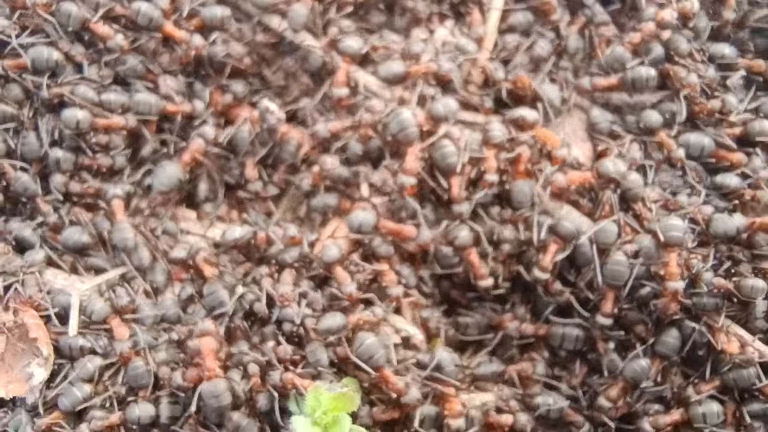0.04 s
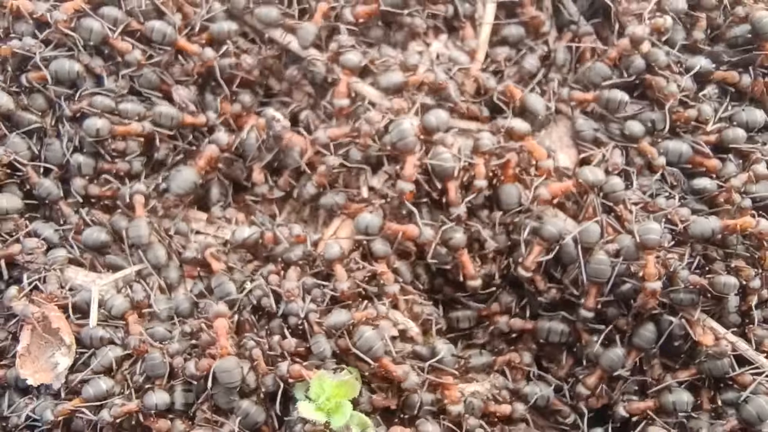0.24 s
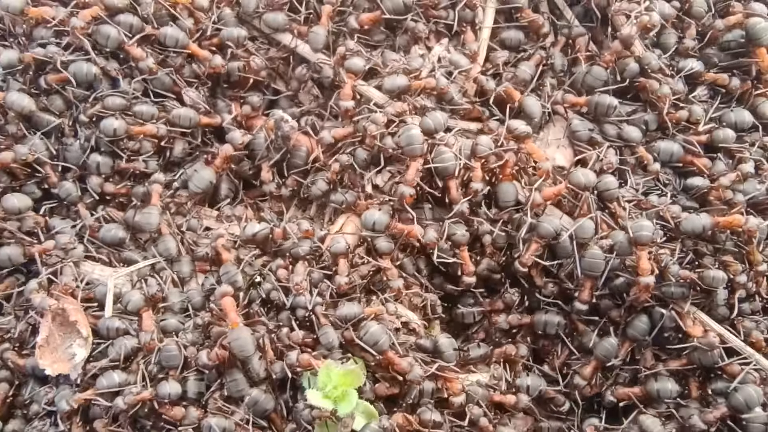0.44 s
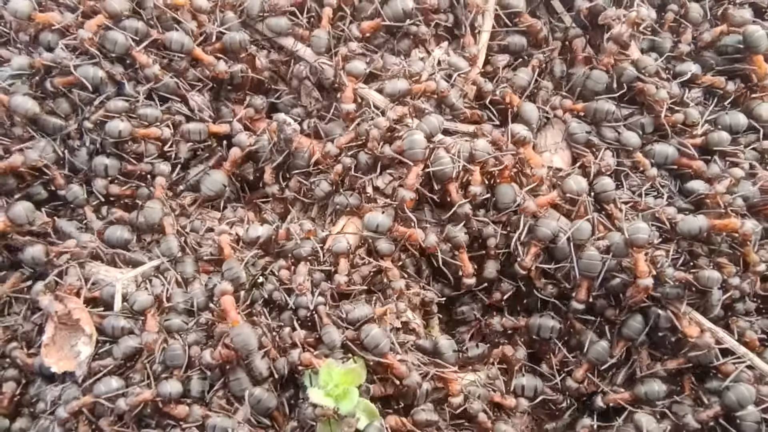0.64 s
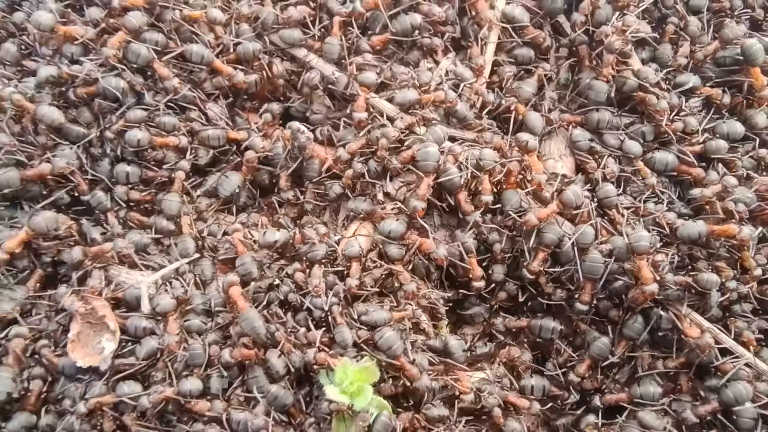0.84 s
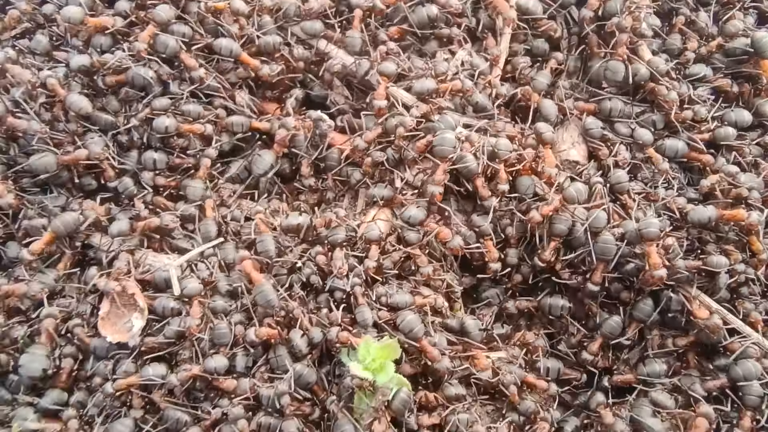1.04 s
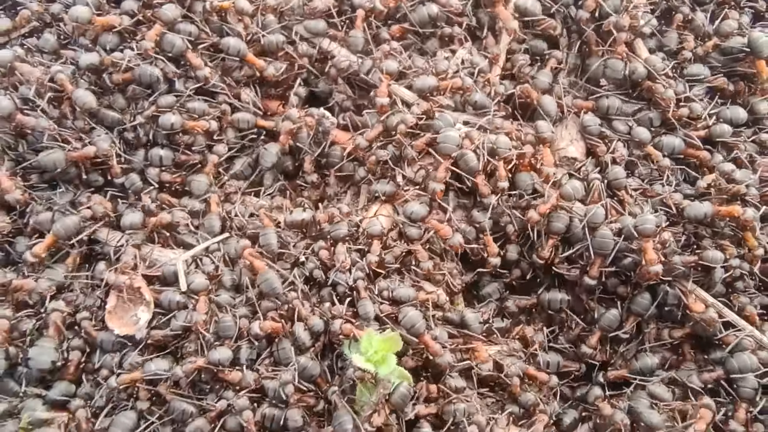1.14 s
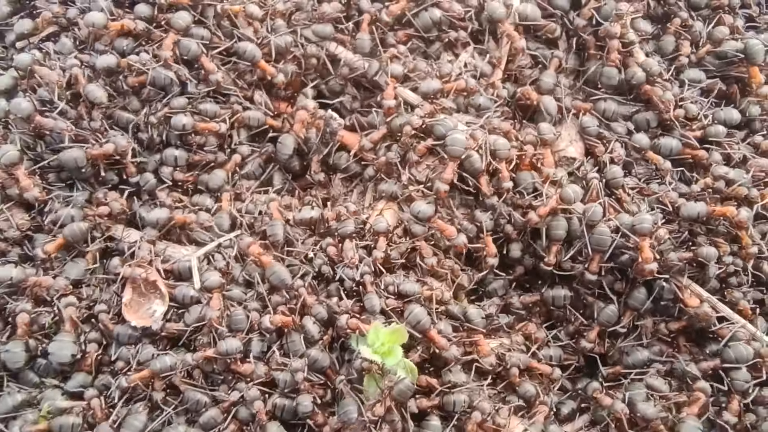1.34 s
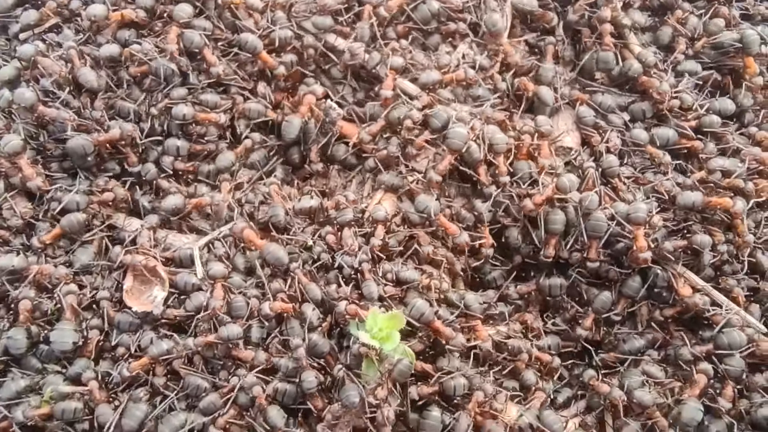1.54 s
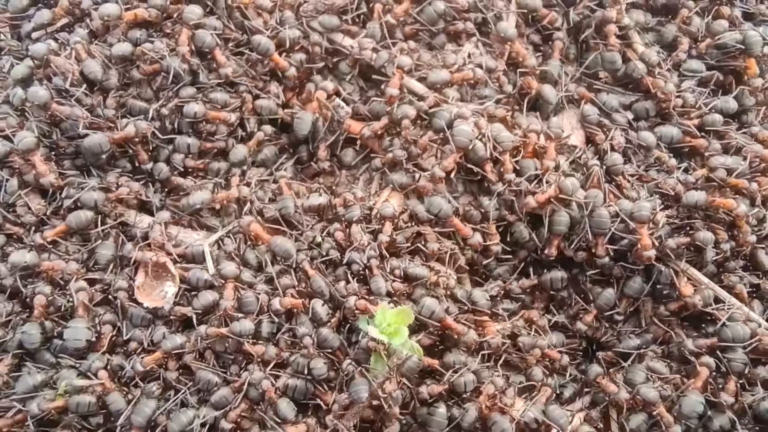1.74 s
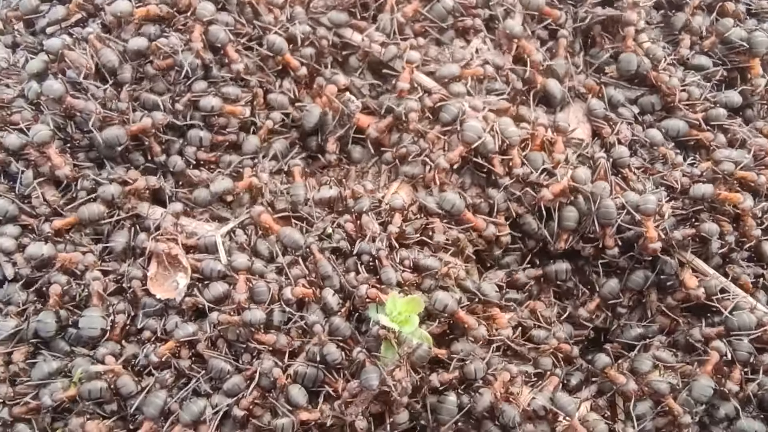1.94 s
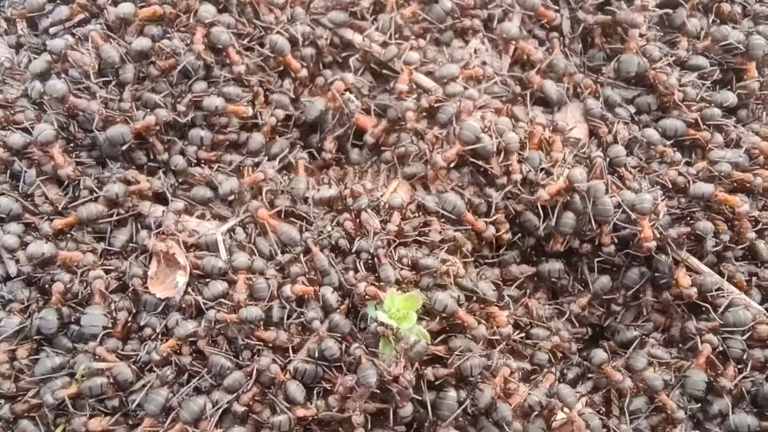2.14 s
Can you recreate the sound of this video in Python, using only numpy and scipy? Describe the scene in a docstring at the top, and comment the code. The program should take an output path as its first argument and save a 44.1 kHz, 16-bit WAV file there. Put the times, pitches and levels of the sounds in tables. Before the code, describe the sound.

Light wind flutters low and unevenly on the microphone throughout, mostly on the left, with harder thumps around 0.3, 0.85, 1.0 and 1.3 seconds. Underneath are a faint steady hiss and the fine crackle of ants on dry litter, more to the right, with soft rustles near 0.5, 0.7 and 1.8 seconds. A very faint distant bird chirps at the start and around 1.7 seconds.

```python
"""Breeze over an anthill

A light breeze throws eddies (little swirls of air) at two microphone openings, mostly the left one,
making a low flutter with a few harder thumps. Under it lie a steady hiss, the fine crackle of
thousands of ant legs on dry plant litter, a few soft rustles and a faint, far bird."""
import sys
import numpy as np
from scipy import signal
from scipy.fft import rfft, irfft
from scipy.io import wavfile
from scipy.ndimage import uniform_filter1d

SR = 44100
rng = np.random.default_rng(int(sys.argv[2]) if len(sys.argv) > 2 else 0)


def file_out(sig):
    """Save sig as 16-bit WAV at sys.argv[1]."""
    # one column per channel
    cols = np.atleast_2d(sig).T
    # limit, then scale
    lim = np.clip(cols, -1, 1)
    pcm = np.round(lim * 32767).astype(np.int16)
    wavfile.write(sys.argv[1], SR, pcm)


N = 97020

# Tone of dry litter when it is tapped: frequency_hz, relative_db
LITTER_TONE = [(600, 0), (1100, 3), (2000, -1), (4000, -2), (6200, -6), (8000, -9), (9500, -24),
               (15000, -30)]


def undb(db):
    """Turn decibels into a number to multiply by."""
    return 10 ** (np.asarray(db) / 20)


def times():
    """The time of each sample, in seconds."""
    return np.arange(N) / SR


def unit(x):
    """Scale a signal to an average power of 1."""
    return x / np.sqrt(np.mean(x ** 2))


def wander(per_s):
    """A smooth random drift, about 1 in size."""
    hold = int(SR / per_s)
    steps = np.repeat(rng.standard_normal(N // hold + 1), hold)
    return unit(uniform_filter1d(steps, hold)[:N])


def colour(x, tone):
    """Shape a sound's tone with rows of frequency_hz, gain_db."""
    hz, db = np.array(tone).T
    bins_hz = np.maximum(np.arange(N // 2 + 1) * SR / N, 1)
    return irfft(rfft(x) * undb(np.interp(np.log(bins_hz), np.log(hz), db)), N)


def hiss():
    """Air and microphones hiss steadily, each side on its own, wavering a little."""
    # Tone of the hiss: frequency_hz, left_db, right_db
    hiss_tone = [(200, -95, -93), (500, -107, -103), (1200, -113, -110), (1900, -115, -105),
                 (3000, -119, -109), (6200, -117, -111), (7300, -127, -116), (8000, -130, -116),
                 (9000, -131, -132), (14000, -130, -130), (15200, -124, -123)]
    swell_db = .4 * wander(3)
    bins_hz = np.arange(N // 2 + 1) * SR / N
    band = np.floor(2 * np.log2(np.maximum(bins_hz, 500)))  # half an octave each
    out = []
    for side, trim_db in enumerate((-.3, -.4)):
        white = rfft(rng.standard_normal(N))
        air = sum(irfft(white * (band == b), N) * undb(swell_db + .8 * wander(16))
                  for b in np.unique(band))
        tone = np.array(hiss_tone)[:, [0, side + 1]]
        out.append(colour(air, tone) * np.sqrt(SR / 2) * undb(trim_db))
    return np.array(out)


def bird():
    """A far bird sings thin, sliding notes; a quick random wobble in pitch blurs them."""
    # Bird notes: start_s, length_s, start_hz, end_hz, right_db, left_minus_right_db
    notes = [(-0.01, .055, 4980, 4750, -75, 0), (-0.02, .12, 3650, 3680, -73.5, -3),
             (0.06, .07, 5850, 5650, -76, -6), (0.105, .05, 3800, 4080, -76, 0),
             (1.58, .11, 3800, 3870, -83, 0), (1.73, .11, 1960, 1860, -73, -8)]
    out = np.zeros((2, N))
    for start_s, length_s, start_hz, end_hz, db, left_offset_db in notes:
        progress = np.clip((times() - start_s) / length_s, 0, 1)
        glide_hz = start_hz + (end_hz - start_hz) * progress
        for side, gain in enumerate(undb([db + left_offset_db, db])):
            hz = glide_hz * (1 + .015 * wander(250))
            out[side] += gain * np.sin(np.pi * progress) * np.sin(2 * np.pi * np.cumsum(hz) / SR)
    return out


def grainy_noise(tone):
    """Noise whose level flickers quickly."""
    return unit(colour(rng.standard_normal(N) * undb(1.5 * wander(120)), tone))


def rustles():
    """The litter gives soft rustles and a few dry ticks, nearer the right microphone."""
    # Soft rustles: middle_s, half_length_s, level_db
    swells = [(0.25, .07, -77), (0.525, .07, -70.5), (0.72, .08, -74), (1.775, .06, -71)]
    # Tone of a rustle: frequency_hz, relative_db
    rustle_tone = [(1000, -17), (1700, -10), (1920, 0), (2150, -8), (2500, -13), (3500, -20), (5600, -19),
                   (6100, -10), (6600, -21), (9000, -36)]
    # Dry ticks: middle_s, level_db
    ticks = [(0.08, -75), (0.523, -71), (0.563, -67.5)]
    t, tick_half_s = times(), .006
    swell = sum(undb(db) * np.exp(-((t - at) / half_s) ** 2) for at, half_s, db in swells)
    tick = sum(undb(db) * np.exp(-((t - at) / tick_half_s) ** 2) for at, db in ticks)
    left, right = (swell * grainy_noise(rustle_tone) + tick * grainy_noise(LITTER_TONE)
                   for _ in range(2))
    return np.array([undb(-8) * left, right])


def ants():
    """Countless tiny feet tap on dry needles, in flurries, a few of them louder."""
    steps_per_s, scatter_db = 600, 4.3
    flurry = undb(2 * wander(12))
    out = []
    for level_db in (-88, -79):  # left, right
        size = undb(scatter_db * np.minimum(rng.exponential(size=N), 5))
        sign = np.sign(rng.standard_normal(N))
        steps = rng.random(N) < steps_per_s / SR
        out.append(undb(level_db) * unit(colour(flurry * size * sign * steps, LITTER_TONE)))
    return np.array(out)


def eddies(rows):
    """Each passing eddy makes one rounded pressure swing: middle_s, peak_db, pitch_hz, phase_rad."""
    out, t = np.zeros(N), times()
    for at, db, hz, phase in rows:
        near = slice(*np.searchsorted(t, [at - .04, at + .04]))
        swing = np.exp(1j * phase) / (1 - .5j * np.pi * hz * (t[near] - at)) ** 5
        out[near] += undb(db) * swing.real
    return out


def flutter(strength, eddy_hz, gain_db):
    """An uneven stream of small eddies; stronger wind makes them louder and higher, up to a limit."""
    per_s, limit_db, reference_db, db_per_octave = 115, -40.5, -45, 24
    count = int(per_s * N / SR)
    late, size, speed, phase = rng.standard_normal((1000, 4))[:count].T
    at = (np.arange(count) + .3 * late) / per_s
    wind_db = np.minimum(np.interp(at, *np.array(strength).T), limit_db)
    octaves = np.maximum(wind_db - reference_db, -7) / db_per_octave + .28 * speed
    return eddies(zip(at, wind_db + gain_db + 2.5 * size, eddy_hz * 2 ** octaves, np.pi * phase))


def rasp(swing):
    """Finely churning air adds a rough noise to the fastest swings of pressure."""
    # Tone of the churning air: frequency_hz, relative_db
    rasp_tone = [(150, -3), (480, 0), (800, -9), (1300, -26), (2000, -44)]
    # How much rasp rides on the swings: time_s, gain_db
    rasp_amount = [(0.27, -17), (0.42, -21), (0.53, -32), (0.65, -19), (0.84, -16.5), (0.87, -19),
                   (1.0, -16.5), (1.3, -19), (1.76, -17), (1.9, -29)]
    slope = np.gradient(swing) * SR / (2 * np.pi * 200)
    force = np.sqrt(np.abs(uniform_filter1d(slope ** 2, size=500)))
    gust_boost = (force / undb(-32)) ** .2
    gain = undb(np.interp(times(), *np.array(rasp_amount).T))
    return gain * force * gust_boost * unit(colour(rng.standard_normal(N), rasp_tone))


def mic_opening(pressure):
    """The opening cuts the deepest bass with a slight ring and muffles fast swings."""
    low_hz, top_hz = 64, 1450
    w = 2 * np.pi * low_hz
    thinned = signal.lfilter(*signal.bilinear([1, 0, 0], [1, w, w * w], SR), pressure)
    return signal.sosfilt(signal.butter(4, top_hz, fs=SR, output="sos"), thinned)


def wind():
    """The breeze flutters at each opening; most hard thumps hit the left one, which faces it."""
    # Wind strength at the left opening: time_s, strength_db
    left_wind = [(0.0, -74), (0.13, -63), (0.26, -34), (0.4, -47), (0.43, -36), (0.49, -64), (0.53, -35),
                 (0.56, -49), (0.87, -36), (0.96, -48), (0.98, -35), (1.16, -52), (1.17, -68), (1.21, -39),
                 (1.3, -35), (1.45, -54), (1.48, -43), (1.62, -45), (1.68, -65), (1.71, -36), (1.85, -52),
                 (1.92, -42), (2.03, -68), (2.11, -47), (2.15, -71), (2.2, -44)]
    # Wind strength at the right opening: time_s, strength_db
    right_wind = [(0.0, -72), (0.19, -64), (0.22, -69), (0.47, -69), (0.53, -42), (0.62, -68), (0.7, -67),
                  (0.77, -43), (0.98, -65), (1.08, -46), (1.33, -60), (1.41, -60), (1.47, -64), (1.65, -52),
                  (1.71, -72), (1.82, -44), (1.95, -68), (2.14, -69), (2.2, -37)]
    # Hard eddies as they reach an opening: middle_s, peak_db, pitch_hz, side (0 left, 1 right)
    thumps = [(0.19, -38, 170, 0), (0.2333, -32, 230, 0), (0.2528, -29, 130, 0), (0.2612, -29, 350, 0),
              (0.2691, -30, 160, 0), (0.285, -19.5, 172, 0), (0.3463, -29, 100, 0), (0.4266, -28, 145, 0),
              (0.5343, -29.5, 100, 0), (0.5353, -36, 100, 1), (0.594, -36, 150, 0), (0.622, -37, 170, 0),
              (0.6855, -29.5, 155, 0), (0.7351, -30, 135, 0), (0.7945, -27.5, 155, 0),
              (0.7972, -36, 100, 1), (0.8189, -27, 320, 0), (0.8315, -28, 300, 0), (0.8389, -22, 330, 0),
              (0.8635, -15.5, 240, 0), (0.872, -27, 100, 0), (0.9286, -33, 140, 0), (0.9842, -30, 180, 0),
              (0.9895, -29, 380, 0), (0.9931, -21, 265, 0), (1.0151, -31, 160, 0), (1.0633, -29, 125, 0),
              (1.092, -33, 90, 1), (1.2227, -31, 125, 0), (1.233, -29, 130, 0), (1.2674, -17.5, 170, 0),
              (1.2805, -19, 160, 0), (1.2937, -21, 135, 0), (1.3349, -31, 150, 0), (1.3653, -27, 130, 0),
              (1.429, -38, 150, 0), (1.4993, -30.5, 150, 0), (1.6117, -33, 110, 0), (1.7144, -27.5, 200, 0),
              (1.7575, -32, 230, 0), (1.7638, -26, 160, 0), (1.778, -35, 280, 0), (1.8263, -29.5, 110, 1),
              (1.9155, -29, 115, 0), (2.104, -36, 85, 0), (2.1793, -36, 120, 1)]
    soft = [flutter(left_wind, eddy_hz=108, gain_db=3), flutter(right_wind, eddy_hz=98, gain_db=3.5)]
    out = []
    for side in range(2):
        hard = eddies((at, db, hz, 0) for at, db, hz, hit_side in thumps if hit_side == side)
        swing = soft[side] + hard
        out.append(mic_opening(swing + rasp(swing)))
    return np.array(out)


def scene():
    """Add all the sounds together, in stereo."""
    return hiss() + ants() + rustles() + bird() + wind()


def record(dry):
    """Cut the highest treble."""
    top_hz = 15750
    return signal.sosfilt(signal.ellip(10, .2, 70, top_hz, fs=SR, output="sos"), dry)


dry = scene()
out = record(dry)
file_out(out)
```